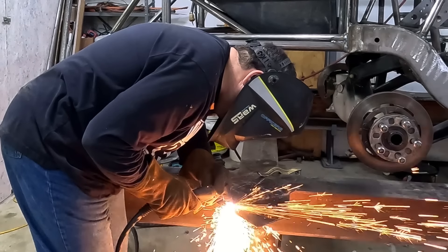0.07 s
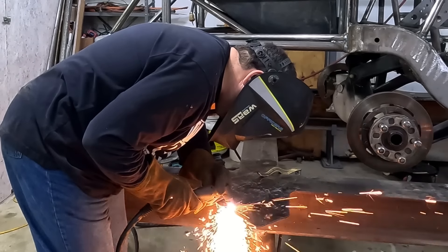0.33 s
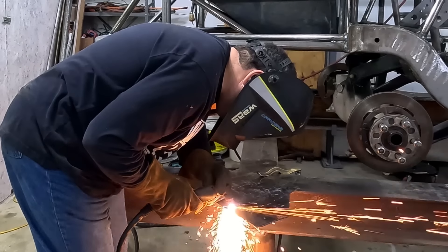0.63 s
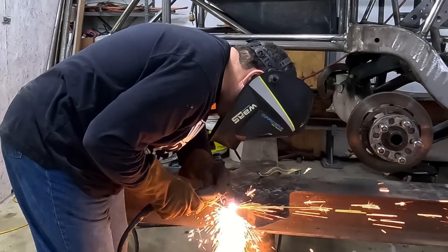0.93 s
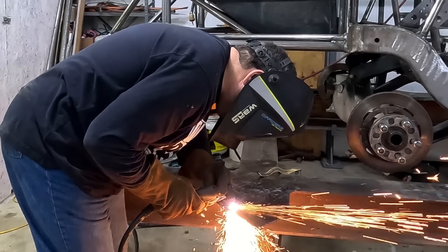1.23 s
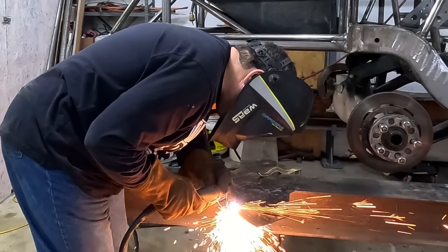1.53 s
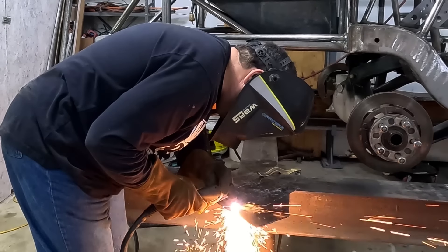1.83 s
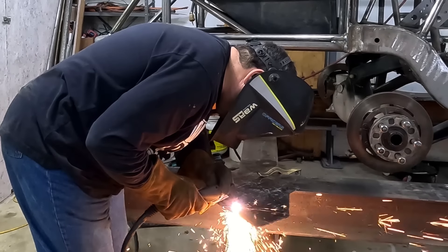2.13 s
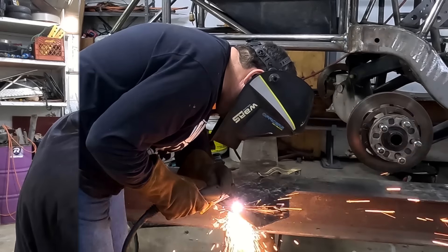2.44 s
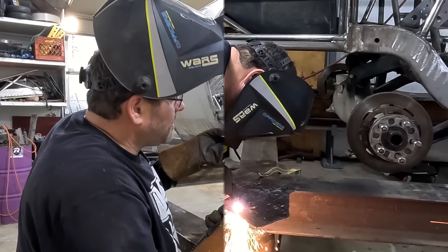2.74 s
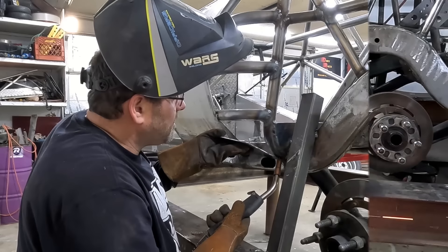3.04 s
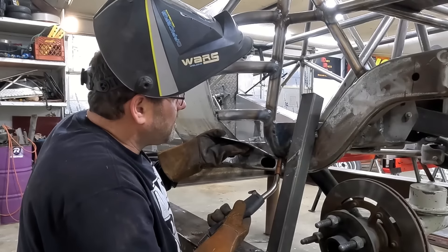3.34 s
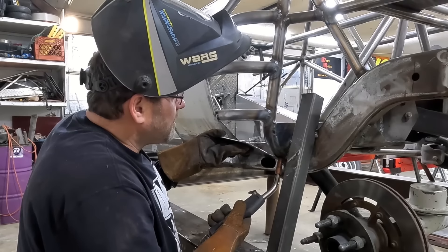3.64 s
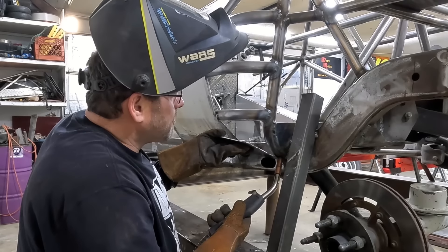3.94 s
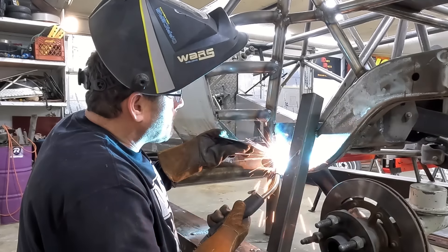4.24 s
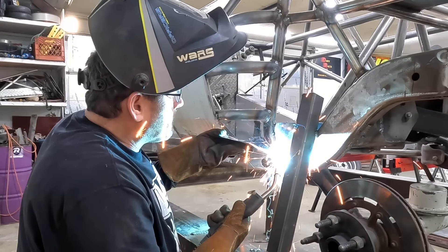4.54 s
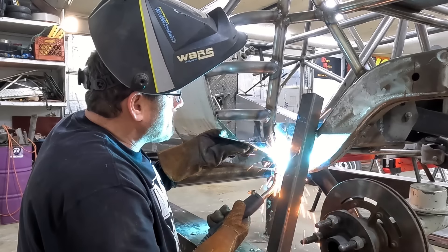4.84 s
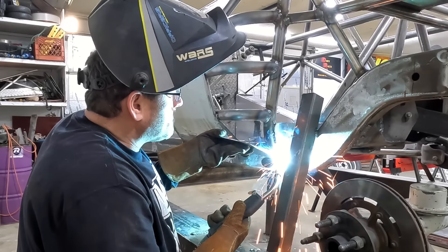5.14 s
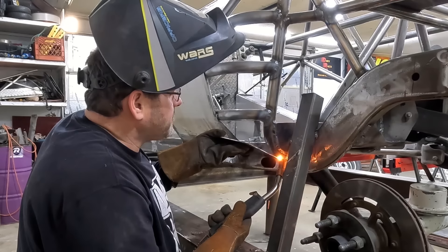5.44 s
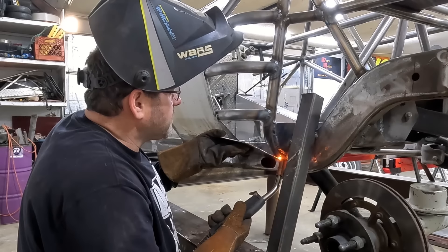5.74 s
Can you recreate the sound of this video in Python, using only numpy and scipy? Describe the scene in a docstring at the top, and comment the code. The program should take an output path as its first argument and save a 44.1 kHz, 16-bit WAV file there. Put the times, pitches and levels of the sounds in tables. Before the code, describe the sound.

Steady plasma cutting hiss with a hoarse whistle gives way to fan hum and one second of loud welding crackle in a workshop.

```python
"""Plasma cutting and wire welding

A plasma torch's turbulent jet hisses as it cuts a steel plate, whistles in the slot and fades out.
A welder's cooling fan fades in, humming. The arc strikes with a rasp, crackles as the wire shorts
into the pool in runs of about 110 shorts a second, then sizzles out in the reverberant workshop.
The pops push a limiter down, so the fan ducks and only slowly comes back."""
import sys
import numpy as np
from scipy import signal
from scipy.fft import rfft, irfft
from scipy.io import wavfile
from scipy.ndimage import uniform_filter1d, minimum_filter1d

SR = 44100
rng = np.random.default_rng(int(sys.argv[2]) if len(sys.argv) > 2 else 0)


def store_wav(level_fs):
    """Save 16-bit WAV to argv[1]."""
    pcm = np.round(np.clip(np.atleast_2d(level_fs), -1, 1) * 32767)
    wavfile.write(sys.argv[1], SR, pcm.T.astype(np.int16))


N = 263718
TIME = np.arange(N) / SR
STRIKE_S, ARC_END_S = 4.2065, 5.24


def from_db(db):
    """Amplitude ratio: tenfold for every 20 dB."""
    return 10 ** (np.asarray(db) / 20)


def unit_rms(x):
    """Normalisation to a mean power of 1."""
    return x / np.sqrt(np.mean(x ** 2) + 1e-20)


def at_hz(points, hz):
    """Interpolation on a logarithmic frequency axis."""
    table_hz, values = np.transpose(points)
    return np.interp(np.log(hz + 1e-3), np.log(table_hz), values)


def contour(points):
    """Amplitude envelope, interpolated in decibels between (time_s, level_db) points."""
    return from_db(np.interp(TIME, *np.transpose(points)))


def gate(start_s, end_s, attack_s=0.02, release_db_per_s=548):
    """Envelope with a linear attack, a hold and an exponential decay."""
    attack = np.clip((TIME - start_s) / attack_s, 0, 1)
    return attack * from_db(-release_db_per_s * np.maximum(TIME - end_s, 0))


def gaussian(centre_s, sigma_s):
    """Gaussian envelope: one smooth rise and fall."""
    return np.exp(-.5 * ((TIME - centre_s) / sigma_s) ** 2)


def drift(rate_hz):
    """Random modulation of rms 1: straight lines between random values."""
    knots = rng.standard_normal(int(rate_hz * N / SR) + 2)
    return unit_rms(np.interp(TIME * rate_hz, np.arange(len(knots)), knots))


def colour(x, spectrum, resonances=(), size=16384):
    """Minimum-phase filtering by a broad spectral envelope with narrow peaks and dips on top."""
    hz = np.arange(size // 2 + 1) * SR / size
    peaks_db = sum(db / (1 + (2 * (hz - centre) / width) ** 2) for centre, width, db in resonances)
    cepstrum = irfft(np.log(from_db(at_hz(spectrum, hz) + peaks_db)))
    # folding the cepstrum makes the filter causal
    cepstrum[1:size // 2] *= 2
    cepstrum[size // 2 + 1:] = 0
    response = irfft(np.exp(rfft(cepstrum)))[:size // 2]
    return signal.oaconvolve(x, response)[:N]


def noise(spectrum, resonances=()):
    """Spectrally shaped white noise of rms 1."""
    return unit_rms(colour(rng.standard_normal(N), spectrum, resonances))


def noise_band(centre_hz, width_hz):
    """Narrow-band noise of rms 1, heard as a rough pitch."""
    edges_hz = [centre_hz - width_hz / 2, centre_hz + width_hz / 2]
    bandpass = signal.butter(2, edges_hz, "band", fs=SR, output="sos")
    return unit_rms(signal.sosfilt(bandpass, rng.standard_normal(N)))


def pulses(events, spectrum):
    """Impulse excitation: one pressure pulse for each (start_s, peak_db)."""
    impulses = np.zeros(N)
    for start_s, peak_db in events:
        impulses[int(start_s * SR)] += from_db(peak_db)
    response = colour(signal.unit_impulse(N), spectrum)
    return colour(impulses, spectrum) / np.abs(response).max()


def resonate(x, modes):
    """Modal superposition: parallel resonators share one drive; the sum has rms 1."""
    ringing = 0
    for hz, width_hz, db in modes:
        mode = signal.lfilter(*signal.iirpeak(hz, hz / width_hz, fs=SR), x + 1e-18)
        ringing = ringing + from_db(db) * unit_rms(mode)
    return unit_rms(ringing)


def scatter(x, t60_s):
    """Diffuse scattering spreads a sound's energy over dense, decaying reflections."""
    reflections = rng.standard_normal(SR // 8) * from_db(-60 * TIME[:SR // 8] / t60_s)
    return signal.oaconvolve(x, reflections / np.linalg.norm(reflections))[:N]


# Reverberation time of the workshop: frequency_hz, t60_s
WORKSHOP_DECAY = [(100, 0.68), (1000, 0.96), (4000, 0.54), (8000, 0.36), (16000, 0.3)]

def workshop(x, wet_db, build_s=0.0037):
    """Reverberation: a diffuse tail follows the direct sound and dies soonest in the treble."""
    t, hz = TIME[:SR], np.arange(SR // 2 + 1)
    white, tail = rfft(rng.standard_normal(SR)), 0
    for band_hz, t60_s in WORKSHOP_DECAY:
        band = at_hz([(f, f == band_hz) for f, _ in WORKSHOP_DECAY], hz)
        tail = tail + irfft(white * band, SR) * from_db(-60 * t / t60_s)
    tail = tail * (1 - np.exp(-t / build_s))
    return x + from_db(wet_db) * signal.fftconvolve(x, tail / np.linalg.norm(tail))[:N]


# Spectrum of the air through the fan: frequency_hz, level_db
FAN_AIR = [(24, -49), (60, -34), (130, -16), (190, -4.5), (240, 0.5), (300, -8), (420, -3.5), (800, -9),
           (1200, -11), (1500, -11), (4600, -18.5), (8500, -35.5), (10600, -55), (12200, -57), (14000, -68)]
# Resonances and dips of the welder's case: centre_hz, width_hz, gain_db
CASE_RESONANCES = [(236, 36, 3.5), (385, 45, 4), (450, 40, -3), (790, 35, 3), (1190, 70, 3), (1268, 30, -6),
                   (1520, 70, -4), (1750, 200, 2), (2780, 160, 3)]
# Fan and motor tones: pitch_hz, level_db, waver_db
FAN_TONES = [(242.7, -40, 3.5), (516.7, -32.3, 1.1), (531, -40.5, 0.5), (792, -55, 2), (1036, -50, -0.5),
             (1061, -47, 3), (1191, -47.5, 4)]

def cooling_fan(air_db=-31):
    """Airflow excites the case's resonances under wavering tones; the two near 520 Hz beat."""
    sound = from_db(air_db) * unit_rms(workshop(noise(FAN_AIR, CASE_RESONANCES), wet_db=-11.5))
    for hz, db, waver_db in FAN_TONES:
        phase = 2 * np.pi * (hz * TIME + rng.random()) + 0.17 * waver_db * drift(8.2)
        tone = from_db(waver_db * drift(18)) * np.sin(phase)
        sound = sound + from_db(db) * unit_rms(tone)
    return sound


def low_bump(level_db=-35):
    """A brief swell of low narrow-band noise is heard as a soft bump after the weld."""
    return from_db(level_db) * noise_band(168, width_hz=35) * gaussian(5.8, sigma_s=.045)


# Touches of the welding gun as it is lined up: start_s, level_db
GUN_TOUCHES = [(3.215, -37), (3.469, -33), (3.648, -32)]
# Spectrum of one touch: frequency_hz, level_db
TICK_SPECTRUM = [(1500, -17), (4000, -10), (6400, 7), (9000, -19), (12500, -15), (15000, -48)]

def gun_ticks():
    """Light impacts on the steel, with more reverberant than direct sound."""
    return workshop(pulses(GUN_TOUCHES, TICK_SPECTRUM), wet_db=2)


# Resonances of the slot: pitch_hz, width_hz, level_db
SLOT_MODES = [(1985, 15, -3.5), (2032, 17, -2), (2081, 18, 2.5)]
# Envelope of the hoarse whistle: time_s, level_db
WHISTLE_ENVELOPE = [(0.1, -30.5), (0.45, -35), (0.62, -32), (0.75, -34), (0.9, -33), (1.2, -31),
                    (1.34, -26), (1.47, -34.5), (1.95, -32), (2.3, -33.5), (2.55, -36)]

def slot_whistle():
    """Flow-excited resonance: the jet blows across the slot's edge and sounds a cluster of modes."""
    air = noise([(1500, -41), (1900, 1), (2200, 1), (2700, -39.5)])
    return contour(WHISTLE_ENVELOPE) * resonate(air, SLOT_MODES)


# Spectra of the jet, the roar in the slot and the hiss of spark sprays: frequency_hz, level_db
JET_SPECTRUM = [(24, -77), (45, -42), (62, -23.5), (110, -19), (170, -20), (230, -15.5), (320, -15.5),
                (500, -17.5), (800, -14.5), (1150, -12.5), (2000, -6.5), (3300, -5), (4200, -5),
                (5500, -3.5), (7900, -8.5), (10500, -24.5), (12500, -27), (14300, -60), (16000, -76)]
ROAR_SPECTRUM = [(100, -26), (300, -5), (450, -8.5), (850, -2), (1200, -5), (2100, 3.5), (3200, -1),
                 (6000, -52), (13000, -78)]
SPARK_SPECTRUM = [(1800, -35), (2900, 0), (3650, 3), (4400, 3), (6000, -39), (13000, -75)]
# Envelopes of the roar and the sprays: time_s, level_db
ROAR_ENVELOPE = [(0.05, -29), (0.35, -38.5), (0.74, -38), (0.9, -29), (1.12, -33.5), (1.33, -29.5),
                 (1.47, -27.5), (1.68, -26), (2.0, -25.5), (2.25, -28.5)]
SPARK_ENVELOPE = [(0.12, -29), (0.4, -30), (0.68, -48), (0.89, -25.5), (1.0, -31), (1.14, -26.5),
                  (1.3, -27), (1.45, -30), (1.75, -28), (2.0, -31.5), (2.25, -28.5)]
# Narrow peaks and dips that room reflections give the jet's hiss: centre_hz, width_hz, gain_db
ROOM_COMB = [(325, 45, 5), (615, 25, 5), (725, 70, 3), (851, 35, 5), (925, 35, -7), (1000, 80, 3),
             (1170, 50, -4), (1340, 30, 7), (1430, 90, 5), (1620, 70, -5), (1992, 26, 3), (2049, 24, 2),
             (2093, 24, 3), (2150, 35, 1.5), (2394, 18, 6.5), (2465, 50, -4), (2678, 22, 4), (2746, 40, 6),
             (3021, 24, 5), (3160, 50, 2.5), (3360, 25, 4), (3440, 50, -2.5), (3545, 60, 3), (3647, 30, 3),
             (3730, 90, 2), (4295, 18, 7.5), (4402, 26, 6), (4740, 70, -3), (4920, 60, 3), (5636, 18, 6),
             (6000, 70, -4)]

def plasma_torch(jet_db=-19.5, sag_db_per_s=0.5, flutter_db=0.44):
    """Turbulent jet noise is coloured by room reflections; roar and sparks surge as the cut opens."""
    jet = from_db(jet_db - sag_db_per_s * TIME) * noise(JET_SPECTRUM, ROOM_COMB)
    roar = contour(ROAR_ENVELOPE) * noise(ROAR_SPECTRUM, ROOM_COMB)
    sparks = contour(SPARK_ENVELOPE) * noise(SPARK_SPECTRUM, ROOM_COMB)
    flutter = from_db(flutter_db * drift(25.4))
    return workshop((jet + roar + sparks) * flutter, wet_db=-11.0)


# Spectrum of the gas round the weld pool: frequency_hz, level_db
GAS_SPECTRUM = [(24, -31), (70, -10), (120, -1.5), (170, -6), (235, 8.5), (320, -9), (500, -45),
                (2000, -56)]

def gas_flutter(level_db=-34, puff_db=12):
    """Unsteady gas flow rumbles while the arc burns, with one puff at the first shorts."""
    level = from_db(level_db + puff_db * gaussian(4.335, sigma_s=.04))
    return level * gate(STRIKE_S, ARC_END_S) * noise(GAS_SPECTRUM)


def arc_singing(level_db=-22):
    """The long arc sings thinly, in a narrow band of noise, just before the shorts begin."""
    return from_db(level_db) * noise_band(7250, width_hz=750) * gaussian(4.282, sigma_s=.018)


# Spectrum of the open arc: frequency_hz, level_db
HISS_SPECTRUM = [(40, -15), (100, -7), (400, -3.5), (1100, 8), (1750, 6), (2500, 5), (3650, 5), (4100, 4),
                 (6600, 5.5), (7500, -5), (8500, -2), (10600, -24), (12000, -20), (14500, -42)]
# Resonances of the gas nozzle: centre_hz, width_hz, gain_db
NOZZLE_RESONANCES = [(1260, 160, 1), (2180, 160, 1.5), (3740, 200, 4), (7450, 400, 1)]

def arc_hiss(burn_db=-28, flare_db=-16.5, sizzle_db=-18, sputter_db=2.0):
    """Amplitude-modulated noise: the arc flares and hisses harder in each run; the hot pool sizzles on."""
    burning = from_db(burn_db) * gate(STRIKE_S, ARC_END_S)
    flare = from_db(flare_db) * gate(4.258, 4.305, attack_s=0.051, release_db_per_s=150)
    feeding = [from_db(hiss_db) * gate(start_s, end_s) for start_s, end_s, *_, hiss_db in SHORT_RUNS]
    sizzle = from_db(sizzle_db) * gate(ARC_END_S, ARC_END_S + 0.088, release_db_per_s=173)
    envelope = np.max([burning, flare, *feeding, sizzle], axis=0)
    sputter = from_db(-sputter_db * drift(120))
    return workshop(envelope * sputter * noise(HISS_SPECTRUM, NOZZLE_RESONANCES), wet_db=-7.5)


# Spurts of burning wire, three at the strike and one in mid-weld: centre_s, sigma_s, level_db, cutoff_hz
WIRE_SPURTS = [(4.2086, 0.0012, -1, 9000), (4.2131, 0.0011, -7.5, 7500), (4.2176, 0.0024, -4.5, 4200),
               (4.817, .004, -8, 4500)]
# Spectrum of their rasp: frequency_hz, level_db
RASP_SPECTRUM = [(100, -19), (900, -8), (1700, -3.5), (3500, -4), (7400, -3.5), (9000, -19), (12000, -40),
                 (15500, -46)]
# Modes of the steel tube: pitch_hz, width_hz, level_db
TUBE_MODES = [(1590, 46, -7), (3190, 36, 1), (4060, 24, 0.5), (7270, 200, -3)]

def arc_strike(ring_db=-5.5):
    """Transient excitation: the wire burns off in noise bursts and the tube rings on in its modes."""
    source, rasp = noise(RASP_SPECTRUM, FRAME_RESONANCES), 0
    for centre_s, sigma_s, db, cutoff_hz in WIRE_SPURTS:
        spurt = from_db(db) * gaussian(centre_s, sigma_s) * source
        rasp = rasp + signal.lfilter(*signal.butter(2, cutoff_hz, fs=SR), spurt + 1e-18)
    ringing = from_db(ring_db) * np.std(rasp) * resonate(rasp, TUBE_MODES)
    return workshop(rasp + ringing, wet_db=-13.0)


# Single pops, where the wire stubs and the arc relights hard: start_s, relative_level_db
SINGLE_POPS = [(4.21, -8), (4.214, -4), (4.218, -18), (4.3017, -1), (4.31, 3.5), (4.335, 2), (4.3447, 2.5),
               (4.36, 1), (4.3711, -8), (4.42, 2), (4.4792, 0.5), (4.5202, -0.5), (4.5444, 1.5),
               (4.7073, 3), (4.717, 1), (4.739, 4), (4.7558, 3.5), (4.8177, -4), (4.8247, 3), (4.83, 4.5),
               (4.8366, -4), (4.861, 3), (4.8984, 2), (4.9777, 3), (5.023, 1.5), (5.0423, 2.5), (5.1686, 2),
               (5.1907, 2), (5.2169, 2)]
# Crackling runs; heft is the knock of heavy drops relative to the short's level:
# start_s, end_s, rate_hz, relative_level_db, heft_db, hiss_db
SHORT_RUNS = [(4.408, 4.4577, 81, -0.5, -17, -20), (4.4648, 4.5005, 135, -1.5, -16, -22),
              (4.52, 4.592, 127, -2, -23, -22), (4.6000, 4.6972, 123, -2, -13, -26.5),
              (4.7808, 4.812, 120, -0.5, -8, -16), (4.8522, 4.8806, 107, -0.5, -15, -21),
              (4.9087, 4.9704, 115, -1, -13, -18), (4.9873, 5.069, 109, -0.5, -11.5, -19),
              (5.0778, 5.1575, 99, -2, -5, -17.5), (5.181, 5.1997, 96, -1, -5, -24),
              (5.2164, 5.237, 109, -3, -8.5, -24)]

def short_circuits(jitter_s=.0004, spread_db=1.6, heft_spread_db=1.5, single_heft_db=-19):
    """Evenly fed wire shorts almost periodically; gives rows of (start_s, level_db, heft_db)."""
    shorts = [(start_s, db, single_heft_db) for start_s, db in SINGLE_POPS]
    singles_s = np.array(SINGLE_POPS)[:, 0]
    for start_s, end_s, rate_hz, db, heft_db, _ in SHORT_RUNS:
        for beat_s in np.linspace(start_s, end_s, round((end_s - start_s) * rate_hz) + 1):
            late, stronger, heavier = rng.uniform(-1, 1, 3) * (jitter_s, spread_db, heft_spread_db)
            if np.abs(singles_s - beat_s).min() > .5 / rate_hz:  # a nearby single pop takes the beat
                shorts.append((beat_s + late, db + stronger, heft_db + heavier))
    return np.array(shorts)


# Spectra of the arc's crack and of a heavy drop's duller knock: frequency_hz, level_db
CRACK_SPECTRUM = [(40, -66), (125, -13.5), (260, -10), (400, -13.5), (1000, -10), (2000, -4.5),
                  (3400, -1.5), (5500, -4.5), (7100, -2.5), (8600, -10), (9700, -7.5), (10600, -30.5),
                  (11500, -17), (13500, -35), (15500, -54.5)]
KNOCK_SPECTRUM = [(40, -52), (100, -19), (250, -14.5), (700, -0.5), (1100, -0.5), (1600, 0), (2300, 2.5),
                  (3500, 3.5), (4800, -1.5), (7000, -33.5)]
# Early reflections from hard surfaces near the arc: delay_s, relative_level_db
EARLY_REFLECTIONS = [(.002, -26), (.00365, -21), (.0046, -25), (.00535, -18), (.007, -19)]
# Resonances and dips of the frame of steel tubes: centre_hz, width_hz, gain_db
FRAME_RESONANCES = [(380, 40, 3), (560, 70, 2), (790, 60, 1.5), (920, 70, -3), (1370, 110, -7),
                    (1600, 170, 3), (1900, 110, -4), (2150, 110, 4.5), (2400, 80, 2.5), (2670, 100, -8),
                    (3200, 90, 4.5), (3560, 110, 2.5), (3780, 140, 2.5), (4030, 90, 2.5), (4270, 180, -4),
                    (4580, 200, 2), (5740, 90, 4), (6150, 260, -4), (6450, 90, 5), (6620, 90, 5),
                    (6850, 140, 3), (7050, 150, -3), (7350, 150, 2.5), (7620, 150, -2.5), (8200, 120, -5),
                    (8460, 160, 4), (8750, 140, -6)]

def arc_pops(gain_db=14.0, dulling=0.62, smear_hz=3900, pole_radius=0.67, ring_db=-14):
    """Each relighting radiates a pressure pulse; the frame rings briefly and the room reflects it."""
    start_s, db, heft_db = short_circuits().T
    # heavy drops trade some of the bright crack for a dull knock
    crack_db = db + 20 * np.log10(np.clip(1 - dulling * from_db(heft_db), 1e-3, 1))
    cracks = pulses(zip(start_s, crack_db), CRACK_SPECTRUM)
    knocks = pulses(zip(start_s, db + heft_db), KNOCK_SPECTRUM)
    pops = from_db(gain_db) * (cracks + knocks)
    # two all-passes disperse each pulse into a push, a pull and a rebound
    poles = [1, -2 * pole_radius * np.cos(2 * np.pi * smear_hz / SR), pole_radius ** 2]
    for _ in range(2):
        pops = signal.lfilter(poles[::-1], poles, pops)
    echoes = sum(from_db(echo_db) * np.interp(TIME - delay_s, TIME, pops, left=0)
                 for delay_s, echo_db in EARLY_REFLECTIONS)
    ringing = from_db(ring_db) * scatter(pops, t60_s=0.08)
    room = workshop(pops, wet_db=-9.0) - pops
    reflected = colour(echoes + ringing + room, [(200, 7.5), (1500, -0.5), (5000, 3.5), (10000, 5.0)])
    return colour(pops + reflected, [(200, 0), (10000, 0)], FRAME_RESONANCES)


def limiter(x, ceiling_db=-0.1, release_db_per_s=10.5):
    """Look-ahead limiting: the gain drops just before each peak and creeps back up."""
    over_db = np.maximum(20 * np.log10(np.abs(x) + 1e-9) - ceiling_db, 0)
    recovery_db = release_db_per_s * TIME
    held_db = np.maximum.accumulate(over_db + recovery_db) - recovery_db
    gain_db = uniform_filter1d(minimum_filter1d(-held_db, size=129), size=129)
    return x * from_db(gain_db)


def stereo_spread(mid, side_spectrum):
    """Mid-side stereo: a faint diffuse copy is added to the two channels in opposite polarity."""
    side = colour(scatter(mid, t60_s=0.058), side_spectrum)
    return np.array([mid + side, mid - side])


# A faint difference between the two channels of the nearly mono sound, mostly in the top treble: frequency_hz,
# side_to_mid_db
FIRST_SPREAD = [(30, -11), (150, -28), (500, -40), (1200, -48), (2300, -68), (5000, -69), (9000, -43),
                (12000, -0.5), (16000, 2)]
SECOND_SPREAD = [(30, -20), (120, -45), (400, -54), (2800, -71), (4500, -30), (8000, -23), (10500, -17),
                 (12000, -4), (16000, 1)]

def scene(silence_s=2.7565, fade_out_s=0.45, fade_in_s=0.49):
    """Superposition of sources: cutting fades to silence, then welding fades in."""
    fade_out = np.clip((silence_s - TIME) / fade_out_s, 0, 1)
    fade_in = np.clip((TIME - silence_s) / fade_in_s, 0, 1)
    cutting = plasma_torch() + slot_whistle()
    arc = arc_strike() + arc_pops() + arc_hiss() + gas_flutter() + arc_singing()
    welding = limiter(cooling_fan() + gun_ticks() + arc + low_bump())
    first = stereo_spread(cutting * fade_out, FIRST_SPREAD)
    second = stereo_spread(welding * fade_in, SECOND_SPREAD)
    return first + second


def record(dry, notch_hz=9060, notch_width_hz=650, cutoff_hz=15800):
    """Band limiting: the microphone port cuts a narrow notch and a steep low-pass removes the top."""
    notched = signal.lfilter(*signal.iirnotch(notch_hz, notch_hz / notch_width_hz, fs=SR), dry)
    return signal.sosfilt(signal.ellip(10, .1, 80, cutoff_hz, fs=SR, output="sos"), notched)


dry = scene()
out = record(dry)
store_wav(out)
```